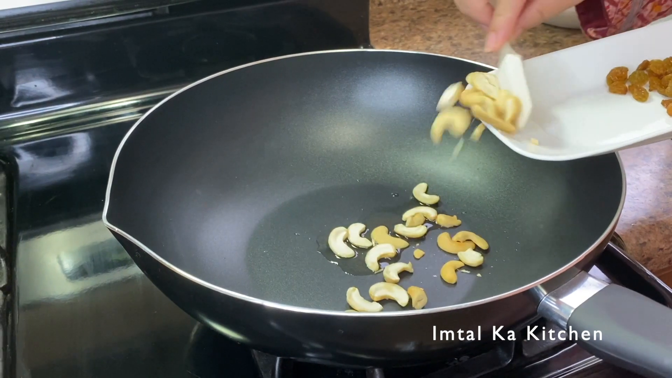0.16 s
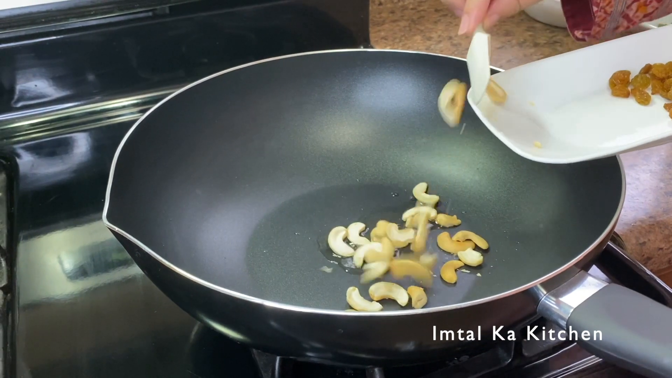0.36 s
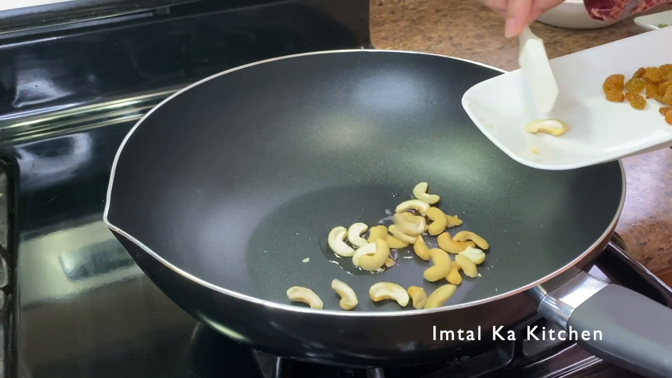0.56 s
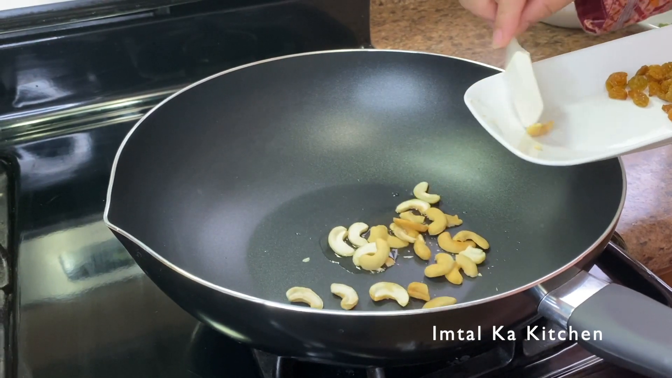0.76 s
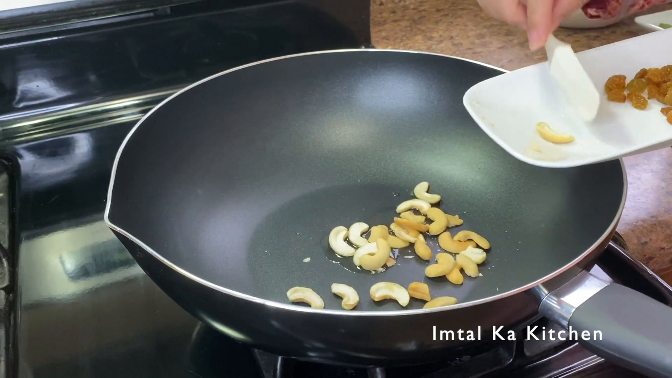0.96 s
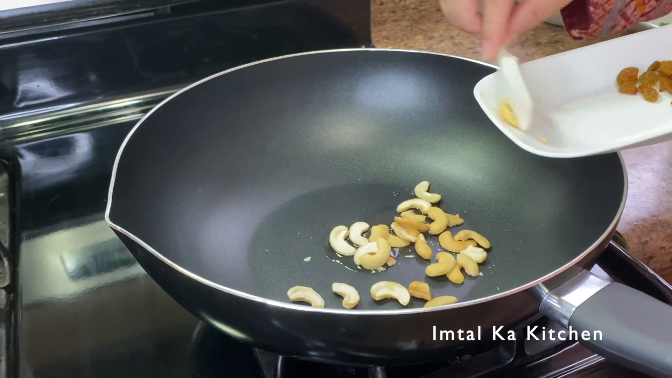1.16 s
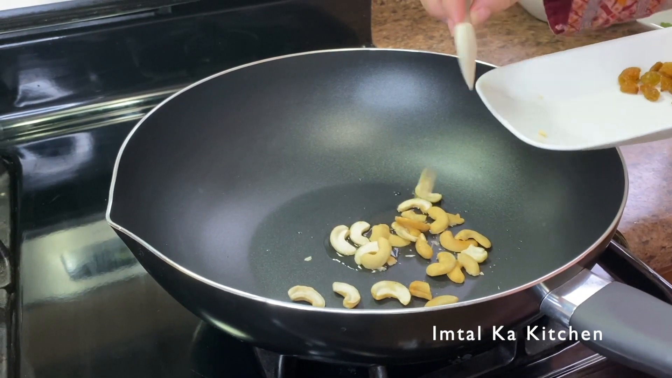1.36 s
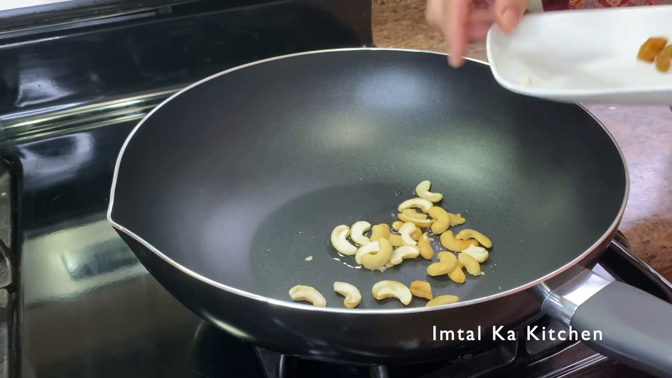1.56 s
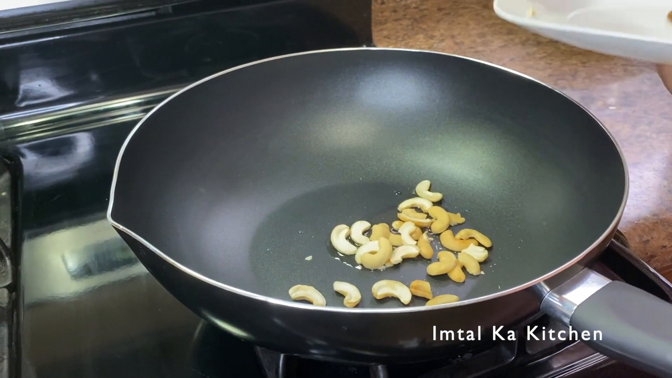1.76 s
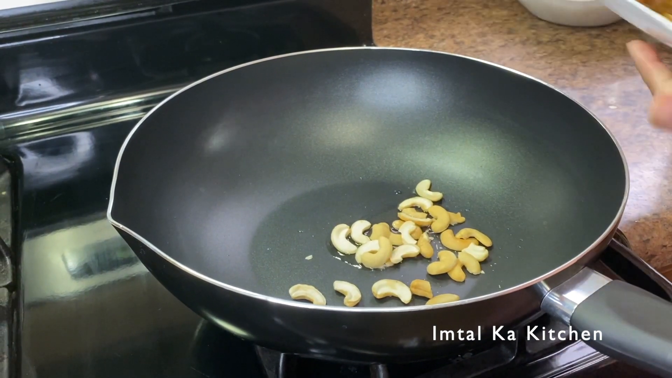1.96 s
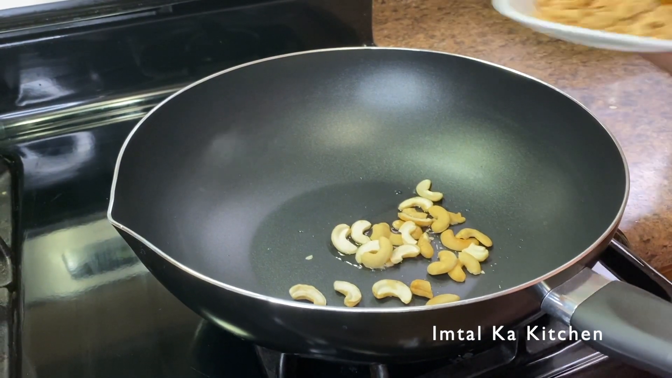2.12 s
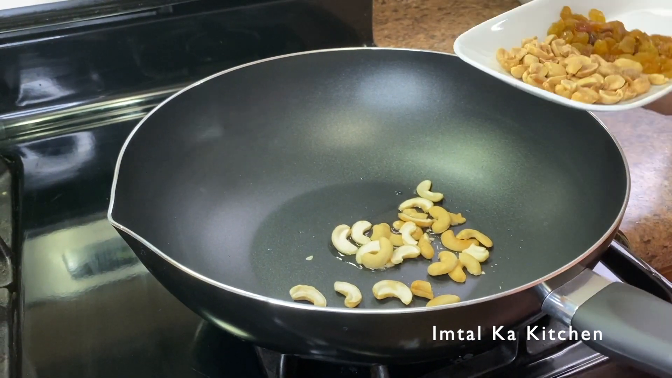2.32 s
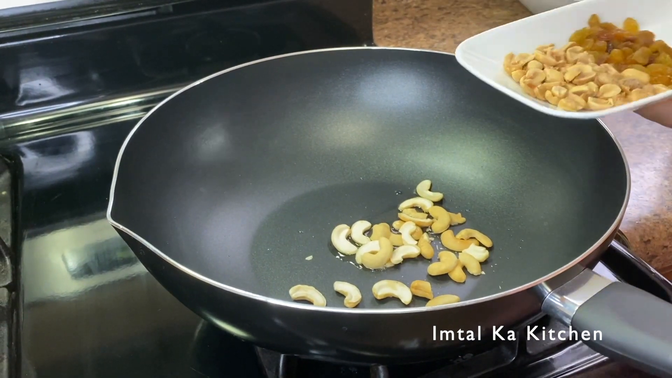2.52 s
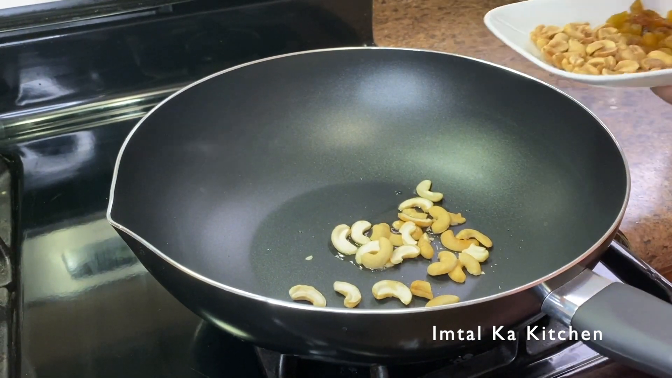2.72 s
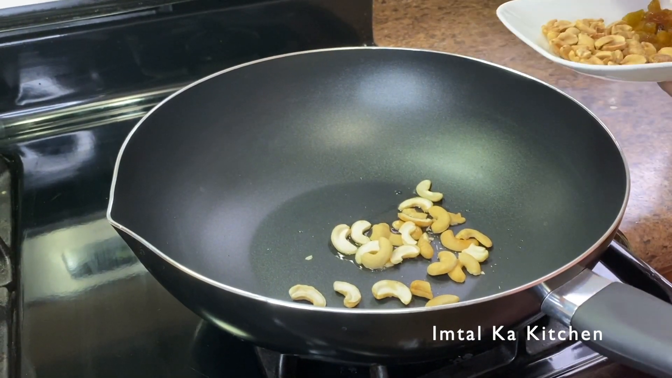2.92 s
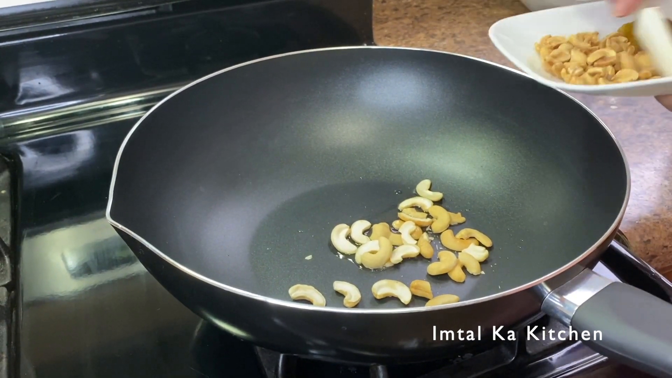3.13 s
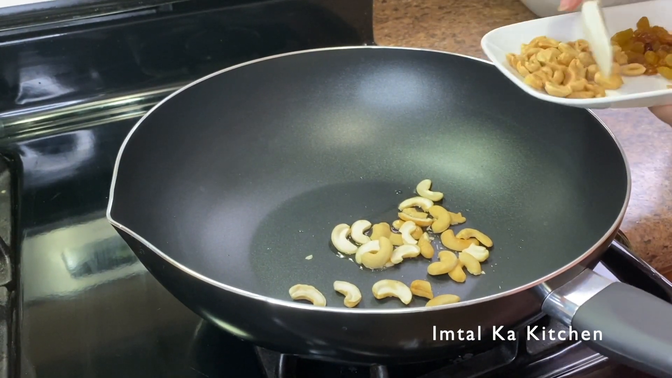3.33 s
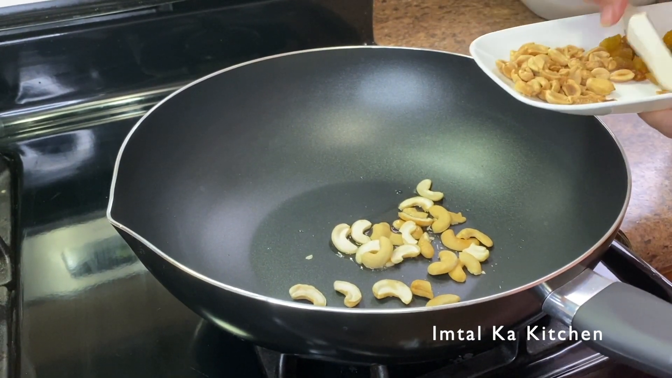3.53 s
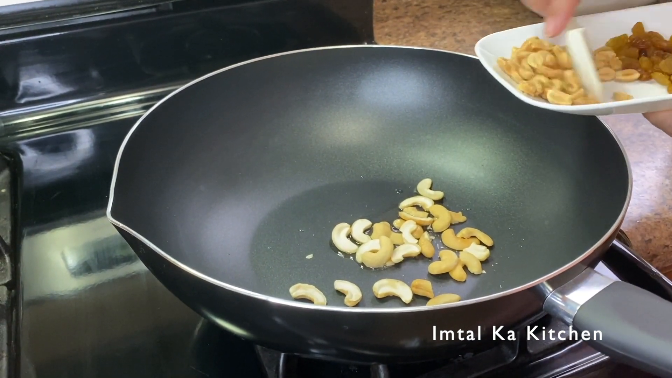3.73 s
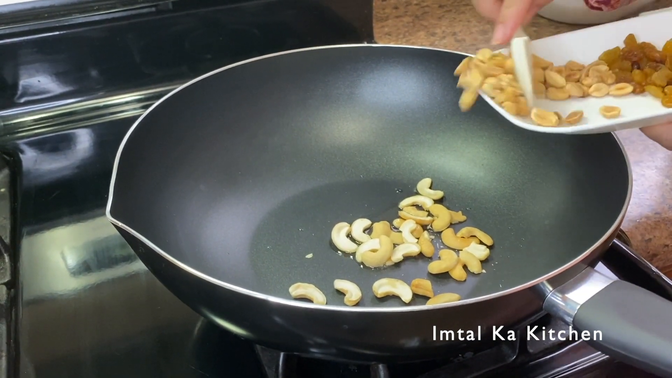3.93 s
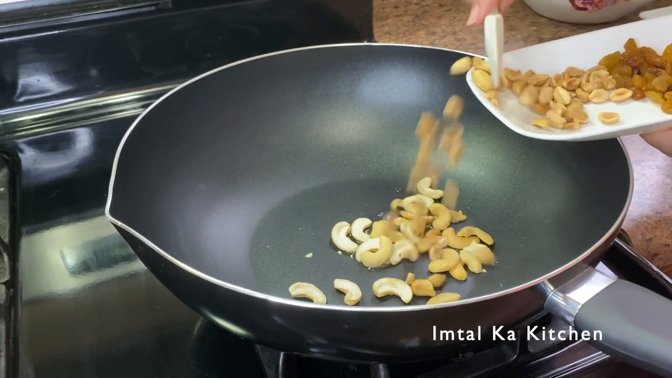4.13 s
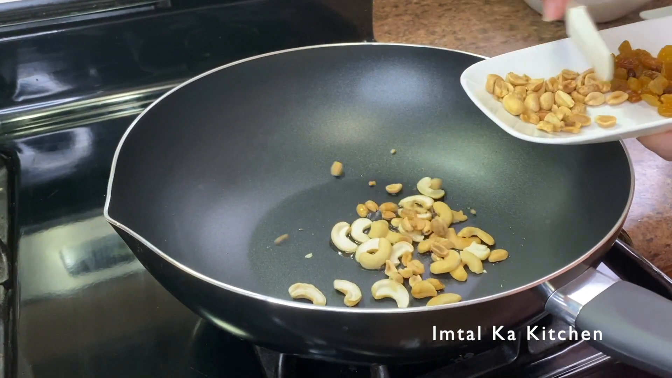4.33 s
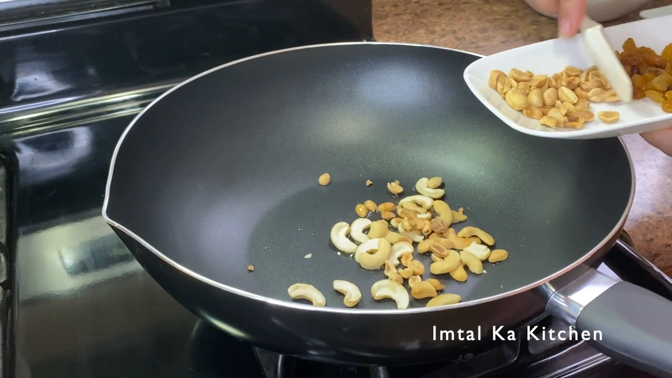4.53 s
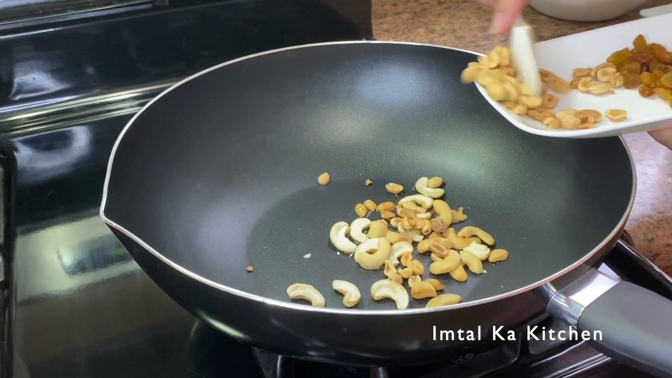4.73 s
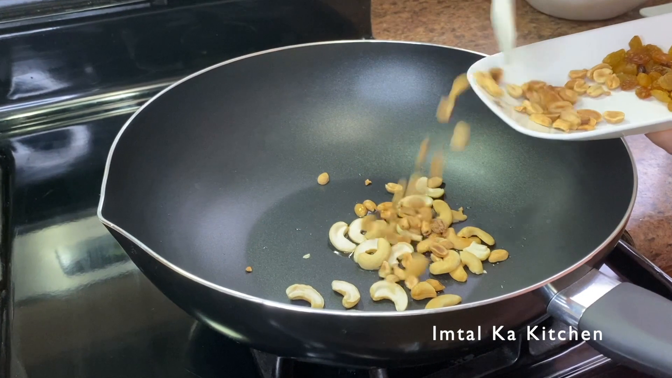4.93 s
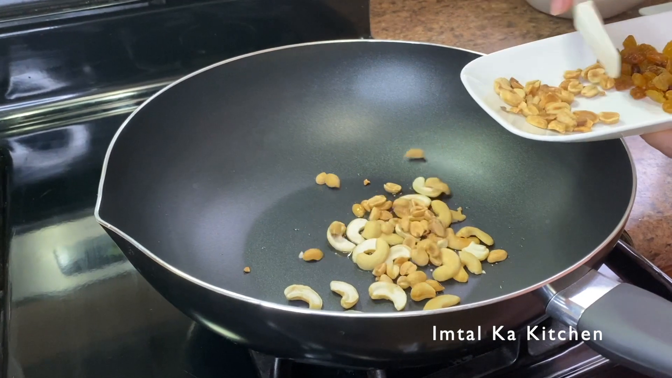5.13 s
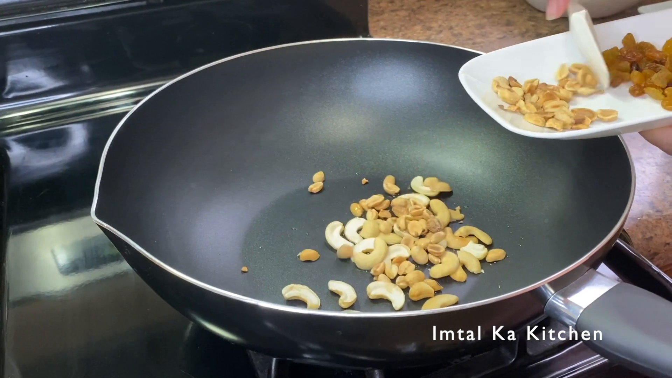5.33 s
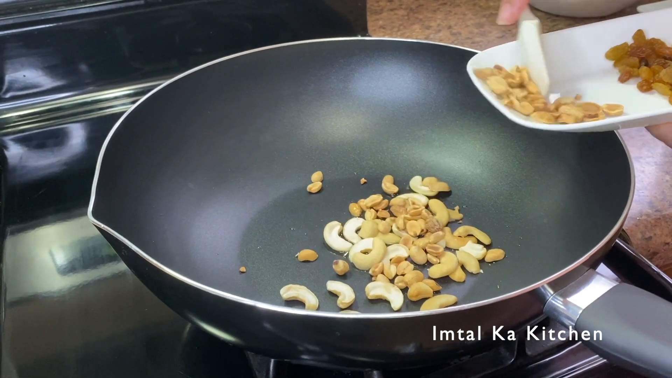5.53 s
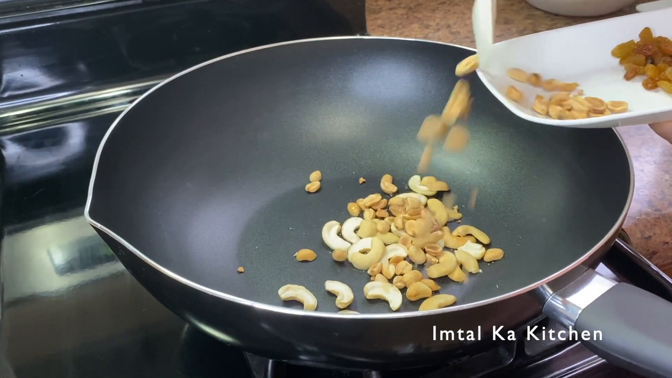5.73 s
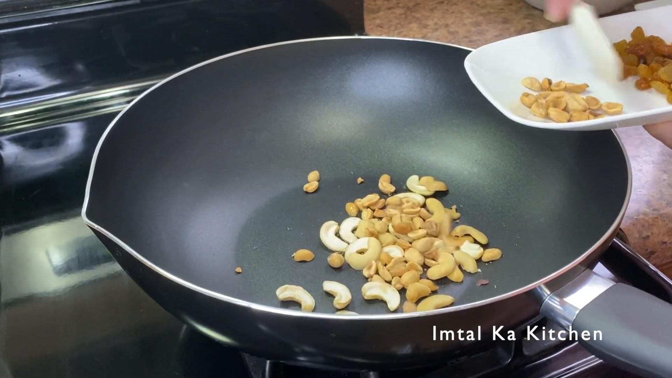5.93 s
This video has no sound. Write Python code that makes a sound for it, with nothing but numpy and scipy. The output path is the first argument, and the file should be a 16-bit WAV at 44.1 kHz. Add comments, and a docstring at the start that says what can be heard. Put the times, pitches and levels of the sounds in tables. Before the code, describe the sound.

Nuts pour off a plate in bursts, rattling and ringing in a pan over a low steady rush, with a sharp plate knock between helpings.

```python
"""In a small kitchen, nuts are pushed in two helpings off a hand-held ceramic plate into a non-stick pan.
Pan and plate sound as sums of decaying modes; showers of nuts and sliding strokes are trains of tiny contacts.
The spatula ticks and scrapes on the plate, which gets one sharp knock between the helpings, then a faint one.
A decaying-noise reverberation surrounds them; filtered noise makes a low steady rush, hum and air sway.
The loudest hits overload the microphone."""
import sys
import numpy as np
from scipy import signal
from scipy.fft import rfft, irfft, next_fast_len
from scipy.io import wavfile

SR = 44100
rng = np.random.default_rng(int(sys.argv[2]) if len(sys.argv) > 2 else 0)


def put_to_file(sound):
    """Save the sound as 16-bit audio at rate SR, in the file named by the first command-line argument."""
    columns = np.atleast_2d(sound).T  # one column per channel
    safe = np.clip(columns, -1, 1)
    whole_steps = np.round(safe * 32767)
    wavfile.write(sys.argv[1], SR, whole_steps.astype(np.int16))


N = 267774
TIME = np.arange(N) / SR

# All levels are relative within their source unless stated otherwise.
# Steady low rush, spectral density: f/Hz, level/dB
RUSH_SPECTRUM = [(12, -3), (30, -20.5), (45, -19), (100, -33), (135, -32.5), (260, -27.5), (450, -29),
                 (850, -37), (1300, -40), (2000, -55.5), (3500, -59), (8000, -64.5), (15500, -69)]
# Hum bands, rms: f/Hz, level/dB
HUM_BANDS = [(170, -55), (217, -53)]
# Air swaying against the microphone, more when the arm moves: t/s, half length/s, level/dB
AIR_GUSTS = [(1.103, 0.17, -10), (2.275, .25, -9.5)]
# Clearest taps of spatula and nuts on the plate:
# t/s, level/dB, favoured f/Hz, treble level/dB (relative to the tap level)
PLATE_TAPS = [(0.0182, -22.5, 2350, -20), (0.0638, -29.5, 2310, -34), (0.132, -15.5, 2620, -18.5),
              (0.1766, -23, 1790, -33), (0.8852, -29, 2200, -12.5), (0.9291, -36.5, 1920, -27),
              (1.2624, -38.5, 1802, -23.5), (3.17, -25.5, 2580, -30), (3.261, -23.5, 2230, -22.5),
              (3.2835, -35, 7410, -10), (3.4856, -35.5, 2560, -16.5), (3.5912, -27, 2830, -34.5),
              (3.694, -26.5, 2520, -18.5), (3.7644, -28, 1890, -10.5), (3.9433, -45.5, 7600, 2),
              (4.0122, -17, 2290, -17), (4.0342, -23, 2320, -33), (4.0785, -28, 7400, -12),
              (4.517, -22.5, 2960, -28), (4.6097, -21, 3770, -42), (4.6982, -33.5, 7800, -7),
              (4.7349, -22.5, 2450, -28), (4.797, -13.5, 2330, -31), (4.8138, -16.5, 4800, -37),
              (4.8279, -15, 2200, -46), (4.9297, -18, 2020, -26), (5.3322, -25.5, 2570, -44),
              (5.5365, -27, 1890, -28), (5.667, -25.5, 1840, -24)]
# Strokes of the spatula along the plate: start t/s, length/s, level/dB
PLATE_STROKES = [(0.125, 0.012, -33), (0.22, 0.053, -35.5), (3.16, 0.047, -35.5), (3.24, 0.036, -34),
                 (3.725, 0.044, -32.5), (3.82, 0.2, -48.5), (4.01, 0.09, -39.5), (4.61, 0.25, -37),
                 (4.795, 0.024, -35), (4.87, .02, -40), (5.33, 0.39, -44.5)]
# Ringing modes of the plate: f/Hz, level/dB, t60/s
PLATE_RING = [(1860, -7, .15), (2310, 1, .035), (2550, 1, .055), (2970, -1, .04), (3780, -1, .075),
              (4610, -10, .08), (4790, -6, .065), (5810, -6, .05), (6730, -8, .035), (7430, -8, .06),
              (8140, -11, .05), (10300, -16, .1), (12400, -24, .06)]
# Crowd of quickly damped plate modes that makes its clack: f/Hz, level/dB
PLATE_DAMPED = [(350, -15.5), (1200, -12), (2400, -5), (4000, -7.5), (7500, -9), (9500, -13.5),
                (16000, -19)]
# What a sliding contact excites most: f/Hz, level/dB
RUB_DAMPED = [(350, -22), (1300, -3), (1900, 2.5), (2500, 9.5), (3300, -9), (4500, -2), (7500, -23.5),
              (9500, -17), (16000, -17)]
# Clearest nuts landing in the pan, and bright ticks of nut on nut as they settle:
# t/s, level/dB, favoured f/Hz, treble level/dB (relative to the contact level)
PAN_CONTACTS = [(0.3127, 0.5, 4150, -19), (0.3581, 3.5, 4170, -11), (0.3644, -14, 4350, -3),
                (0.4059, 11, 2300, -34), (0.4104, 1, 4000, -8.5), (0.4349, 10, 3050, -25),
                (0.4484, -1, 1810, -22), (0.5272, 7, 3230, -14), (1.4386, -15, 3040, -23.5),
                (1.474, -22, 4270, -14.5), (1.5204, -22, 1942, -34), (4.1006, -7, 3060, -22.5),
                (4.121, -6.5, 3000, -28), (4.147, -11.5, 2800, -10.5), (4.1774, -3.5, 4020, -11),
                (4.1874, -14, 4170, -5), (4.1999, -1, 3040, -14), (4.2254, -4, 2870, -16),
                (4.2547, -2.5, 2450, -13.5), (4.2624, -15, 4420, -9), (4.3144, -22, 5540, -5),
                (4.4004, -40, 5840, 11), (4.4233, -36.5, 6050, 11.5), (4.4593, -43, 5860, 9),
                (4.9524, -7, 4530, -27), (4.9571, -7.5, 4060, -12.5), (4.9714, -4, 1930, -33),
                (4.9884, -6.5, 2900, -35), (5.0084, -5, 2010, -36), (5.0619, -2.5, 2950, -40),
                (5.0804, -5, 2940, -19.5), (5.1562, -19, 5440, -1.5), (5.7857, -8, 2170, -19.5),
                (5.8032, -8.5, 2280, -10), (5.812, -8.5, 3000, -15.5), (5.8651, -4.5, 6650, -16.5),
                (5.8794, -12, 2980, -39)]
# Showers of nuts: start t/s, swell/s, crest level/dB, dying rate/(dB/s), nut-on-nut click level/dB
NUT_POURS = [(0.312, .13, -22, 147, -42), (1.439, .03, -40, 138, -64), (4.102, .12, -24, 105, -42.5),
             (4.956, 0.013, -28, 51, -56), (5.786, 0.11, -29, 111, -61)]
# Ringing modes of the pan: f/Hz, level/dB, t60/s
PAN_RING = [(560, -15, .25), (675, -15, .3), (748, -16, .3), (798, -14, .3), (1012, -8, .4), (1321, 1, .36),
            (1390, -5, .28), (1610, -7, .26), (2063, 5, .34), (2239, -2, .22), (2483, -7, .2),
            (2547, -6, .22), (2698, -7, .2), (2780, -7, .18), (3010, -2, .14), (3040, 3, .28),
            (3842, -6, .22), (4093, -5, .18), (4126, -4, .18), (4249, -6, .18), (4379, -4, .18),
            (5012, -9, .14), (5445, -9, .12), (5564, -7, .15), (6200, -10, .12), (8095, -20, .15)]
# Crowd of quickly damped pan modes that makes its clack: f/Hz, level/dB
PAN_DAMPED = [(350, -31.5), (450, -9.5), (520, 2), (780, 5.5), (920, -6.5), (1250, 0), (1850, -1.5),
              (2150, 4.5), (2450, -2.5), (3050, 4.5), (3500, -3.5), (4200, 2.5), (6000, -3), (8000, -8.5),
              (11000, -19), (16000, -28.5)]
# Crisp click of the dry nuts: f/Hz, level/dB
NUT_DAMPED = [(350, -41.5), (3000, -22.5), (5500, -0.5), (8500, -2), (11000, -7.5), (16000, -12)]
# The plate set down hard, and its small after-knock: t/s, level/dB
PLATE_KNOCKS = [(1.720, -1.5), (1.9315, -31)]
# Modes of the hand-damped plate: f/Hz, level/dB, t60/s
KNOCK_RING = [(1200, -19, .012), (1841, -16, .012), (2234, 0, .014), (3010, 1, .007), (3740, -5, .008),
              (4150, -9, .008), (4790, -7, .008), (5790, -14, .008), (7000, -16, .01), (7570, -14, .012),
              (8140, -16, .014)]
# Faint rustles of handling: start t/s, length/s, level/dB
HANDLING_RUSTLES = [(2.05, 0.33, -60), (2.56, 0.055, -53.5)]
# Soft bumps while the plate is turned round: t/s, level/dB
HANDLING_BUMPS = [(2.087, -25.5), (2.322, -25.5)]
# Kitchen reverberation by band: f/Hz, t60/s, level/dB
KITCHEN_DECAY = [(400, 0.33, -6), (1000, .5, 1), (2240, 0.45, -12), (4300, 0.52, -9.5), (7600, 0.37, -3.5),
                 (15800, 0.11, 3.5)]

RUSH_DB, DRAUGHT_DB = -32, -21.5   # rms levels
# how clearly each kind of contact rings, relative to its clack
CONTACT_RING_DB, TUMBLE_RING_DB, TAP_RING_DB, RUB_RING_DB = -11, -12, -4.5, -0.5
# gentle contacts have more low body: (share in dB for a contact listed at 0 dB, change in dB per dB)
PAN_LOW, PLATE_LOW = (-18.5, -0.23), (-25, -.1)
SWELL_DB = 8.5   # a shower starts this far below its crest
SETTLE_LAG_S = .09   # the nuts' clicks against each other follow this much later
PRESS_S, LIFT_DB_PER_S = .015, 330   # the hand presses on, then lets go
GLINT_HZ, GLINT_DB = (6900, 7960), -17.5   # band of the glints, and level relative to the slips
CUTOFF_HZ = 15650


def from_db(db):
    """Level to amplitude ratio: 20 dB is a factor of ten."""
    return 10 ** (np.asarray(db) / 20)


def rms_one(x):
    """Normalisation to unit root-mean-square amplitude."""
    return x / np.sqrt(np.mean(x ** 2) + 1e-20)


def at_hz(points, hz, axis=1):
    """Interpolation of a table column along logarithmic frequency."""
    rows = np.array(points)
    return np.interp(np.log(np.maximum(hz, 1)), np.log(rows[:, 0]), rows[:, axis])


def filtered(x, hz, kind, order=2):
    """Butterworth filtering: a maximally flat passband."""
    return signal.sosfilt(signal.butter(order, hz, kind, fs=SR, output="sos"), x)


def noise(spectrum):
    """Spectral shaping: white noise weighted by a tabulated colour, rms 1."""
    size = next_fast_len(N)
    colour = from_db(at_hz(spectrum, np.fft.rfftfreq(size, 1 / SR)))
    white = rfft(rng.standard_normal(size))
    return rms_one(irfft(white * colour, size)[:N])


def add(track, s, sound):
    """Superposition: a sound joins the track at time s."""
    start = int(np.clip(s * SR, 0, N - 1))
    track[start:start + len(sound)] += sound[:N - start]


def ringing(modes, size):
    """Free vibration: each mode is an exponentially decaying sine, one per row."""
    hz, db, t60 = np.transpose(modes)[:, :, None]
    t = np.arange(size) / SR
    return from_db(db - 60 * t / t60) * np.sin(2 * np.pi * hz * t)


def body(modes, clack, clack_t60, ring_db, count=420, size=16000):
    """Modal superposition: clear modes ring, a crowd of damped ones clacks; returns the answer to a contact."""
    hz = np.linspace(350, 16000, count) + rng.uniform(-18, 18, count)
    t60 = clack_t60 * np.sqrt(3000 / hz)   # the treble dies sooner
    damped = ringing(np.column_stack([hz, at_hz(clack, hz), t60]), size // 3)
    clear = ringing(modes, size)

    def answer():
        """Point excitation: each spot drives the modes with other strengths and signs; attack rms 1."""
        signs = rng.choice([-1, 1], len(clear))
        strengths = signs * from_db(rng.normal(0, 3, len(clear)))
        ring = strengths @ clear
        crack = rng.standard_normal(count) @ damped
        attack = slice(size // 64)
        out = from_db(ring_db) * ring / ring[attack].std()
        out[:len(crack)] += crack / crack[attack].std()
        return out / out[attack].std()
    return answer


def blows(rows, answer, low_rule, mid_db, favour_db, favour_width, contact_s, size=600):
    """Impact excitation: each spot favours one resonance; the level of the blow sets its share of low body."""
    out = np.zeros(N)
    for s, level_db, favoured_hz, treble_db in rows:
        hit = answer()
        # the force builds up as the contact seats
        hit = hit * (1 - np.exp(-np.arange(len(hit)) / (contact_s * SR)))
        around = np.clip(favoured_hz * np.exp([-favour_width, favour_width]), 100, 19000)
        hit = hit + from_db(favour_db) * filtered(hit, around, "band", order=1)
        low = filtered(filtered(hit, 1600, "low", order=6), 450, "high", order=3)
        mid = filtered(hit, [1700, 5600], "band", order=4)
        high = filtered(hit, 4800, "high", order=4)
        low_db = low_rule[0] + low_rule[1] * level_db
        for part, db in ((low, low_db), (mid, mid_db), (high, treble_db)):
            add(out, s, from_db(level_db + db) * part / part[:size].std())
    return out


def rattle(answer, per_s, spread_db, wander_db, count=8):
    """Random impulse excitation: tiny uneven contacts wander between a few spots; rms 1."""
    out = np.zeros(N)
    for spot in range(count):
        strengths = from_db(spread_db * np.minimum(rng.exponential(1, N), 3))
        sizes = strengths * rng.choice([-1, 1], N)
        visit = np.clip(rms_one(filtered(rng.standard_normal(N), 12, "low")), -2, 1.2)
        happens = rng.random(N) < per_s / count / SR
        touches = sizes * from_db(wander_db * visit) * happens
        out += signal.oaconvolve(touches, answer())[:N]
    return rms_one(out)


def strokes(rows):
    """Amplitude envelope of hand movements: each presses on, holds and lets go."""
    gain = np.zeros(N)
    for s, length, db in rows:
        press = np.clip((TIME - s) / PRESS_S, 0, 1)
        lift_db = LIFT_DB_PER_S * np.maximum(TIME - s - length, 0)
        gain += press * from_db(db - lift_db)
    return gain


def background():
    """Broadband and narrow-band noise: a steady rush, a wavering hum, slow pressure swings of moving air."""
    rush = from_db(RUSH_DB) * noise(RUSH_SPECTRUM)
    hum = np.zeros(N)
    for hz, db in HUM_BANDS:
        hum += from_db(db) * rms_one(filtered(rng.standard_normal(N), [hz - 4, hz + 4], "band"))
    slow = filtered(rng.standard_normal(N), 6.71, "low", order=4)
    sway = rms_one(filtered(slow, 1.9, "high"))
    draught = from_db(DRAUGHT_DB)
    for s, width, db in AIR_GUSTS:
        draught = draught + from_db(db) * np.exp(-((TIME - s) / width) ** 2)
    return rush + hum + draught * sway


def plate():
    """Impact and sliding friction: taps on the glaze, and drags made of tiny slips with a few bright glints."""
    tapped = body(PLATE_RING, PLATE_DAMPED, clack_t60=0.018, ring_db=TAP_RING_DB)
    rubbed = body(PLATE_RING, RUB_DAMPED, clack_t60=.022, ring_db=RUB_RING_DB)
    taps = blows(PLATE_TAPS, tapped, PLATE_LOW, mid_db=-10, favour_db=9, favour_width=0.082,
                 contact_s=0.00057)
    slips = rattle(rubbed, per_s=280, spread_db=3.5, wander_db=3.5)
    # hard nut edges make the glaze glint during a stroke
    glints = rattle(tapped, per_s=9.6, spread_db=0.5, wander_db=6.5, count=3)
    glints = from_db(GLINT_DB) * rms_one(filtered(glints, np.sort(GLINT_HZ), "band"))
    drags = strokes(PLATE_STROKES) * (slips + glints)
    return from_db(-6.5) * taps + from_db(-9.5) * drags


def shower(start, swell_s, crest_db, dying_db_per_s):
    """Amplitude envelope of one pour: a sudden start, a swell to the crest, an exponential decay."""
    t = TIME - start
    below_db = SWELL_DB * np.clip(1 - t / swell_s, 0, 1)
    dying_db = dying_db_per_s * np.maximum(t - swell_s, 0)
    return (t >= 0) * from_db(crest_db - below_db - dying_db)


def pan():
    """Repeated impact: nuts land on the metal, tumble, and click against each other as they come to rest."""
    struck = body(PAN_RING, PAN_DAMPED, clack_t60=.056, ring_db=CONTACT_RING_DB)
    rolled = body(PAN_RING, PAN_DAMPED, clack_t60=.05, ring_db=TUMBLE_RING_DB)
    clicked = body(PAN_RING, NUT_DAMPED, clack_t60=0.035, ring_db=-27)
    hits = blows(PAN_CONTACTS, struck, PAN_LOW, mid_db=-11.5, favour_db=0, favour_width=.14,
                 contact_s=.0008)
    tumble = rattle(rolled, per_s=340, spread_db=4, wander_db=3.5)
    clicks = rattle(clicked, per_s=200, spread_db=3.5, wander_db=2.5, count=4)
    out = from_db(-6.0) * hits
    for s, swell_s, crest_db, dying, clicks_db in NUT_POURS:
        out += shower(s, swell_s, crest_db, dying) * tumble
        out += shower(s + SETTLE_LAG_S, swell_s, clicks_db, dying) * clicks
    return out


def knocks():
    """Strong damping: the hand makes a hard knock die within a few cycles, with a brief chatter of the contact."""
    modes = ringing(KNOCK_RING, size=4000)
    clack = (-1) ** np.arange(len(modes)) @ modes   # neighbouring modes swing in opposite senses
    clack = filtered(clack, 5000, "low")
    chatter = body(PLATE_RING, PLATE_DAMPED, clack_t60=0.044, ring_db=-9.5)
    out = np.zeros(N)
    for s, level_db in PLATE_KNOCKS:
        add(out, s, from_db(level_db) * clack / np.abs(clack).max())
        add(out, s, from_db(level_db - 17) * filtered(chatter(), 4800, "low"))
    return out


def handling():
    """Low modes and shaped noise: dull bumps and a faint rustle as the plate is turned."""
    rustle = noise([(500, 2.5), (2500, -1.5), (6000, -9), (15000, -13.5)])
    out = strokes(HANDLING_RUSTLES) * rustle
    thud = ringing([(47.4, 7, 0.085), (103.8, -10.5, 0.077)], size=8000).sum(0)
    for s, db in HANDLING_BUMPS:
        add(out, s, from_db(db) * thud)
    return out


def kitchen(x, early_db, early_t60, size=30000):
    """Reverberation by convolution: fast-decaying close reflections from hob and wall, then a diffuse tail."""
    t, response = np.arange(size) / SR, np.zeros(size)
    edges = np.geomspace(250, 17000, 10)
    for low, high in zip(edges, edges[1:]):
        hz = np.sqrt(low * high)
        tail = from_db(-60 * t / at_hz(KITCHEN_DECAY, hz))
        early = from_db(early_db - 60 * t / early_t60)
        band = filtered(rng.standard_normal(size), [low, high], "band")
        response += from_db(at_hz(KITCHEN_DECAY, hz, axis=2)) * (tail + early) * band
    response *= np.clip(t / 0.0043, 0, 1)   # the reflections build up over 4.3 ms
    return signal.oaconvolve(x, response / np.linalg.norm(response))[:N]


def scene():
    """Superposition: pan and plate sound directly and in the kitchen, each with its own close reflections."""
    nuts, dish, knock = pan(), plate(), knocks()
    pan_room = kitchen(from_db(-4.0) * nuts, early_db=3, early_t60=0.049)
    plate_send = from_db(-3.0) * dish + from_db(-8) * knock
    plate_room = kitchen(plate_send, early_db=-3, early_t60=0.15)
    return (nuts + dish + knock + pan_room + plate_room + handling() + background())[None]


def record(dry):
    """Overload and band limit: the loudest hits clip, then an elliptic low-pass cuts the top."""
    clipped = np.clip(dry, -.9, .9)
    return signal.sosfilt(signal.ellip(10, .1, 70, CUTOFF_HZ, fs=SR, output="sos"), clipped)


dry = scene()
out = record(dry)
put_to_file(out)
```